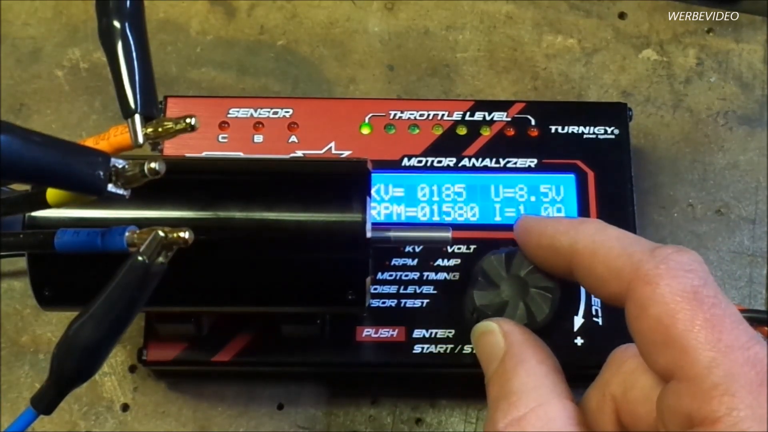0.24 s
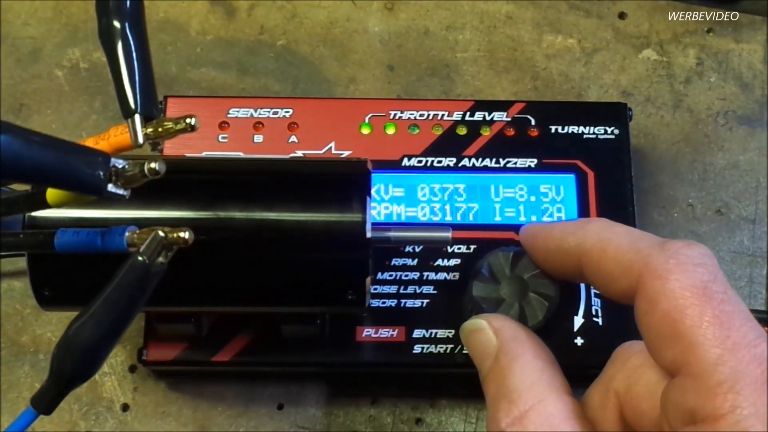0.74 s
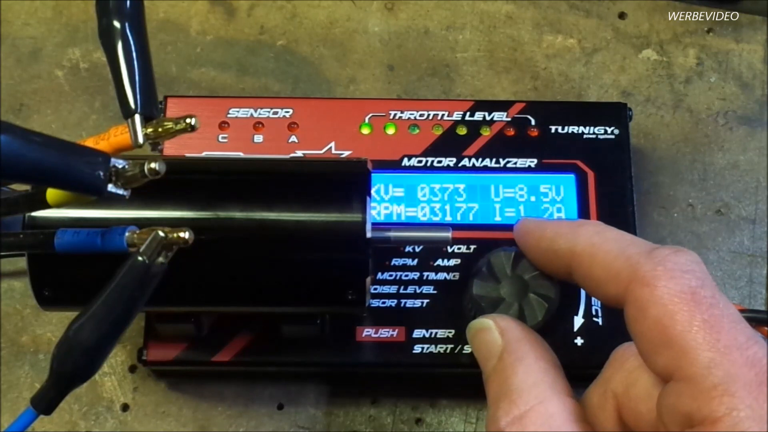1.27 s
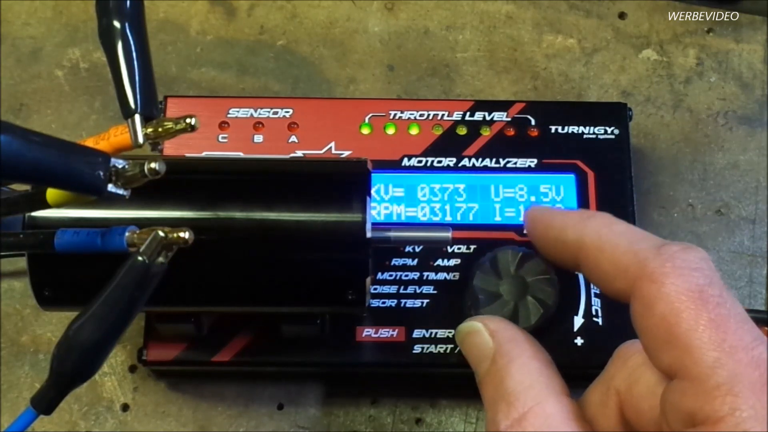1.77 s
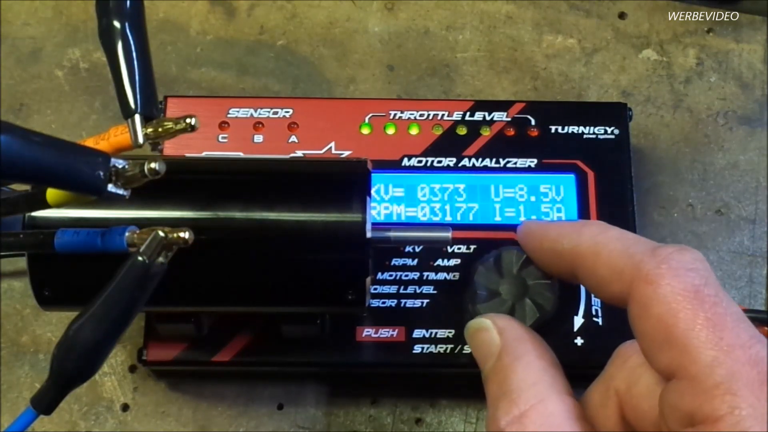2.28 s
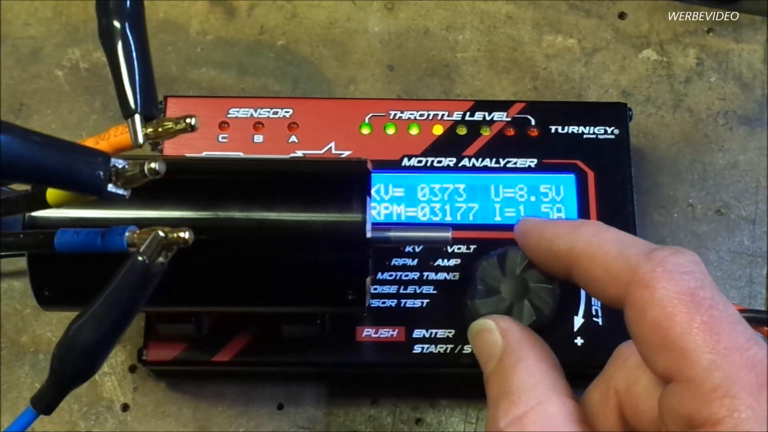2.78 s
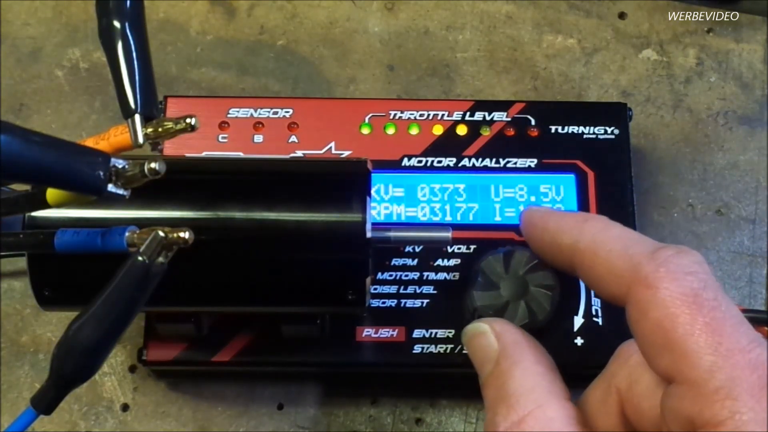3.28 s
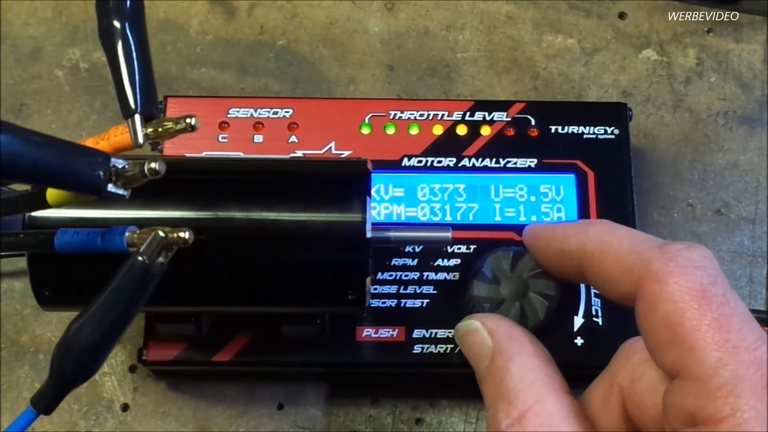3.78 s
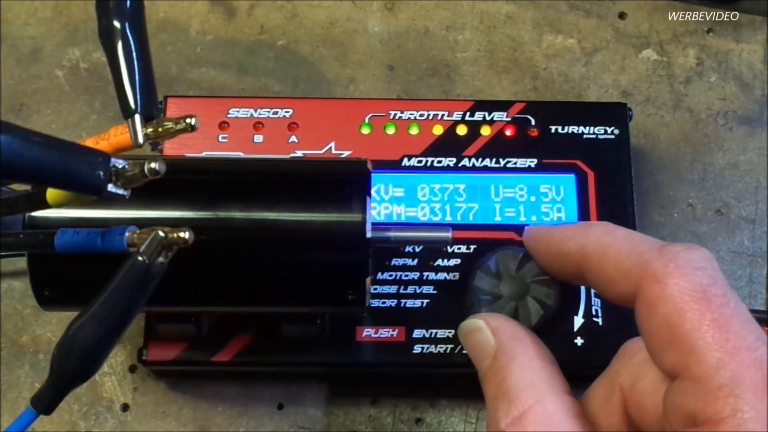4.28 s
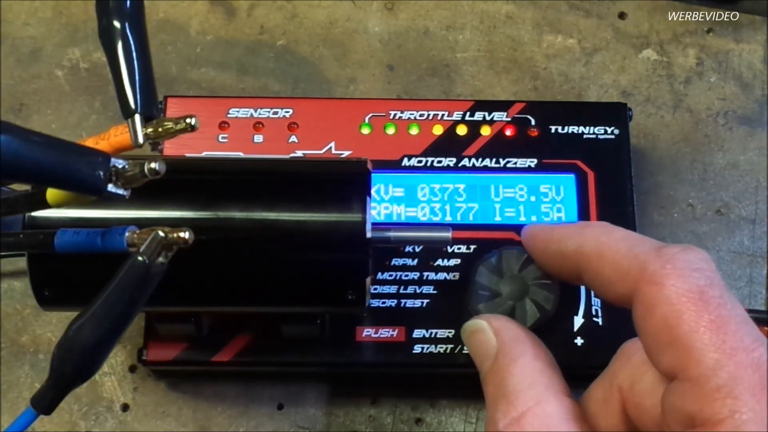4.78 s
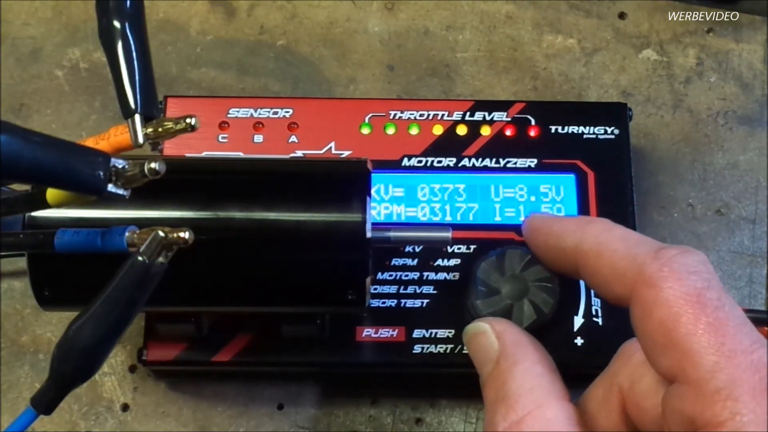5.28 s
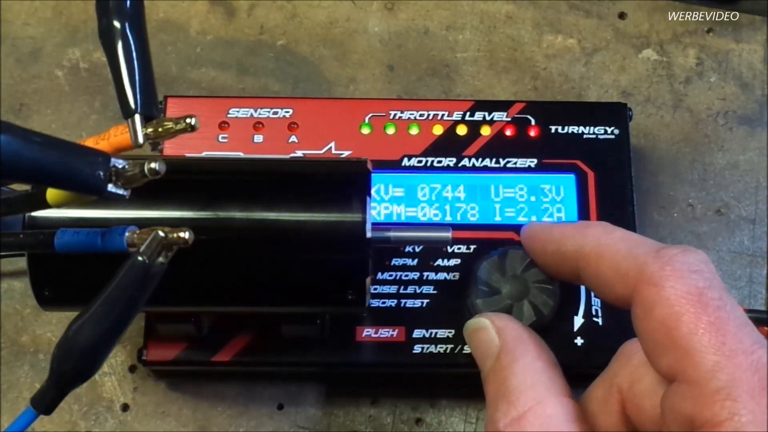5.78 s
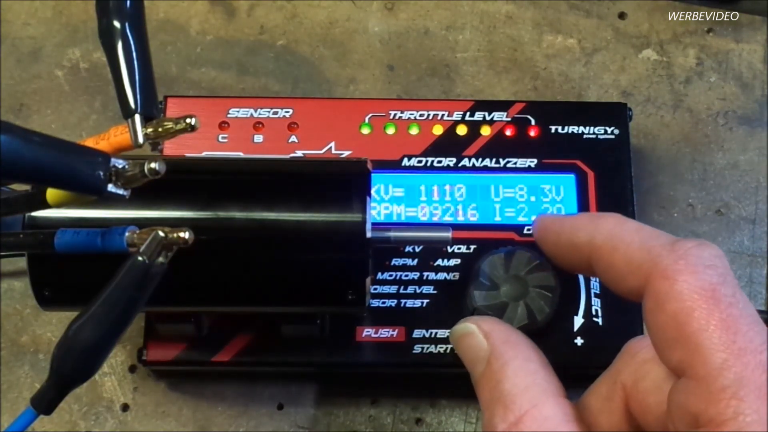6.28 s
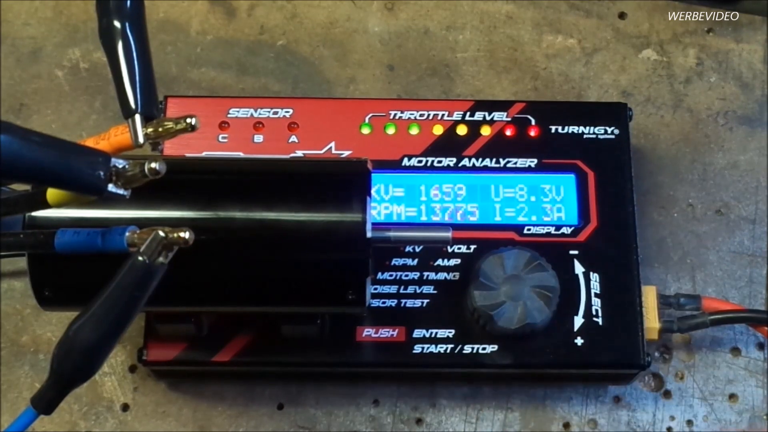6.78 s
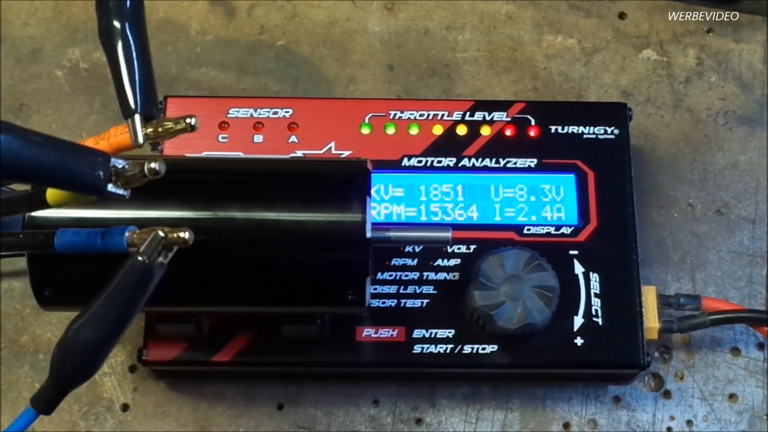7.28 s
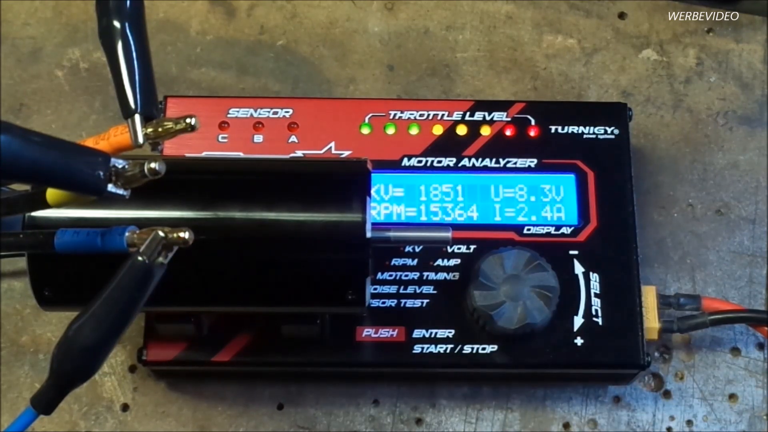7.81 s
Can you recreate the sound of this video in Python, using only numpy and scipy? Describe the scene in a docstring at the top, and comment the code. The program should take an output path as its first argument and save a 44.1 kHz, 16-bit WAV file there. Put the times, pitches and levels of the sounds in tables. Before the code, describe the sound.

A small brushless motor, heard very close on a workbench, is already turning at the start. From 0 to 0.8 seconds it holds a nasal whine around 1.6 kHz over a soft, rough bearing rush. From about 0.9 the pitch rises quickly, reaching roughly 2.2 kHz by 1.5, then climbs in smaller, slowing steps to about 2.8 kHz by 3.5 and 3 kHz by 5. Low hum and shrill overtones an octave up rise with it, flaring and dipping as they cross resonances of the metal housing. A thin fixed whistle near 8 kHz is strongest around 2 seconds and fades later. Fine bearing ticks blend into a high grainy sizzle. A last small lift comes between 6.4 and 7 seconds, then a steady whine near 3.2 kHz continues to 8, without stopping. Faint low drone and quiet hiss lie underneath; the sound is centred, with little room.

```python
"""A steady whine and rush come first: a small brushless motor idles, unloaded, on a bench close by.
Its throttle is then turned up, and tones at multiples of the shaft speed climb together.
They flare as they sweep through the resonances of the housing, which colour random bearing noise too.
The controller's whistle is strongest at half duty and fades out at full throttle.
A faint drone and a quiet hiss lie underneath."""
import sys
import numpy as np
from scipy import signal
from scipy.fft import rfft, irfft, next_fast_len
from scipy.io import wavfile
from scipy.ndimage import uniform_filter1d

SR = 44100
rng = np.random.default_rng(int(sys.argv[2]) if len(sys.argv) > 2 else 0)


def to_wav(s):
    """Save 16-bit WAV."""
    ch = np.atleast_2d(s).T  # columns
    pcm = np.round(np.clip(ch, -1, 1) * 32767)  # PCM
    wavfile.write(sys.argv[1], SR, pcm.astype(np.int16))


N = 355005

# Shaft speed as the throttle is turned up in stages: (t/s, speed/Hz)
SPEED = [(0.0, 133.55), (0.2, 134.89), (0.76, 133.74), (0.87, 138.79), (1.47, 186.11), (1.74, 191.21),
         (2.17, 211.36), (2.48, 222.08), (2.95, 230.86), (3.38, 236.84), (3.87, 241.63), (4.76, 249.01),
         (5.34, 251.83), (5.47, 254.01), (6.42, 256.93), (6.62, 259.85), (6.93, 267.04), (8.05, 266.88)]
INERTIA_S = 0.12  # the rotor rounds off each change of throttle over this time
MID_SPEED_HZ = 200  # the speed at which tone levels are stated

# An order is a tone's pitch in multiples of the shaft speed.
# Tone rows, one for each order: (level/dB at mid speed before swells, growth/dB per doubling of speed,
#   swells or dips [(speed/Hz, half width/Hz, change/dB), ..]); levels are before the housing.
# Magnetic pull at 12 commutations a turn, and its neighbours one turn rate away
WHINE_ORDERS = (11, 12, 13)
WHINE_ROWS = [(-48.7, 5.1, [(161.2, 2.2, 4), (167.6, 2.6, -15), (201.7, 13.3, 2.4), (238.3, 8.1, -6.4),
              (257.3, 1, -5.3)]), (-55.8, 6.8, [(166.8, 3, 12.5), (172.9, 5, -11.5), (219.2, 5.7, -8.7),
              (243.5, 8.1, 6.2), (266, 1.9, -11.9)]), (-57.7, 3.3, [(143.9, 2.1, 9.3), (235.9, 4.6, -5.8),
              (254.7, 10.9, -8.4), (262.9, 1.1, -8.2)])]
# Overtones an octave above the whine; same columns
SHRILL_ORDERS = (22, 23, 24, 26)
SHRILL_ROWS = [(-79, 10, [(230, 14.5, 11), (253.7, 16, 10.7), (260.8, 3.3, 6.9)]),
               (-65.5, -8.5, [(150.6, 1.1, 4), (201, 31, 10), (248, 3.2, -13), (267, 7.8, 3)]),
               (-76, 9, [(226, 10, 3)]), (-81, 13.5, [(245, 10.4, 11), (217.5, 11, 12), (267, 3, 0)])]
SHRILL_FADE_DB, SHRILL_FADE_HZ = 2, 2  # size and rate of their random fades
# Pitches at which the sides of the can cancel each other: (f/Hz, half width/Hz, change/dB)
CAN_NULLS = [(2020, 12, -4), (2142, 12, -4), (2343, 14, -6), (3345, 45, -15), (3835, 70, -10),
             (4247, 55, -10), (4552, 45, -20), (5303, 30, -10)]
# Unbalance, bearing balls passing, four poles passing, orders 7 and 8; tone rows as above
HUM_ORDERS = (1, 2.57, 4, 7, 8)
HUM_ROWS = [(-65, 15.3, [(165, 9, -14), (176, 6, 8), (232, 7.9, 6), (245.6, 4.4, -5.5), (134, 20, -9)]),
            (-74, 40.3, [(230, 20.8, -28)]), (-68.5, 16.5, [(150, 12, -17), (228, 7.2, -12.5),
            (260, 5.3, 5.5)]), (-88.5, 5, [(242, 21, 3.7)]), (-80.5, 5.3, [(216, 5.9, 6.9),
            (254.6, 20.4, 15.3), (231.7, 4, 4.3)])]
# Faint orders, one row each: (level/dB, loudest speed/Hz, change of speed that costs 6 dB/Hz)
FAINT_ORDERS = (6, 9, 14, 16, 18.71, 20, 21, 25.56, 28, 35, 36)
OVERTONE_ROWS = [(-74.5, 255, 5), (-78, 226, 30), (-66, 310, 11), (-81, 690, 87), (-72.5, 243, 15),
                 (-74.5, 263, 46), (-62.5, 164, 2), (-84, 410, 71), (-77, 214, 29), (-73.5, 135, 9),
                 (-77, 220, 14)]

# Controller whistle: pitch, level at half duty, and powers that shape duty and strength
SWITCH_HZ, SWITCH_DB, DUTY_POWER, RIPPLE_POWER = 7964.6, -62, 1.8, 0.67
# Sidebands that commutation puts on it: (offset/shaft speeds, level against the carrier/dB)
SIDEBANDS = [(-5, -21), (-10, -10), (14, -25)]

RACE_ORDER = 4.428  # ticks per turn of the shaft
# Harmonics of the bearing race's ticks, before the bite: (f/Hz, level/dB)
RACE_SPECTRUM = [(6000, -95), (6700, -82), (7150, -77), (7600, -90), (8500, -79), (9100, -76),
                 (9500, -74.5), (10000, -74.5), (10600, -100), (11200, -80), (12000, -82), (13000, -90)]
# How hard the balls strike the blemish: one row with the columns of a tone row
RACE_BITE = (1.9, 1.6, [(237, 9.4, 4.5), (266.6, 5, -11)])
# Shape of the rolling noise, later scaled to its overall level: (f/Hz, relative level per Hz/dB)
ROLLING_SPECTRUM = [(40, -12), (130, -6.5), (300, -1), (560, -3.5), (930, -1.5), (1300, -3.5), (1780, -15),
                    (2150, -5.5), (2800, -7), (3500, -10), (4500, -3.5), (7200, -17), (10400, -12.5),
                    (15000, -8)]
ROLLING_DB = -58.5  # overall level at top speed, before throb, unrest and housing

# Resonances of the motor can and its stand: (f/Hz, width/Hz, level against the direct sound/dB)
HOUSING_MODES = [(122, 7.6, 10), (303, 32, -1.5), (560.3, 25.8, 16.5), (918.6, 42, 12.5), (1800, 22, 30),
                 (1913, 25, 5), (3470, 100, 10), (7144, 330, 10), (9490, 330, 2), (10520, 470, 7)]
# Low drone under the bench: one row with the columns of a tone row
DRONE_ROW = (-82, -2.6, [(243, 12, 7)])
# Shape of the room and microphone hiss, later scaled: (f/Hz, relative level per Hz/dB)
HISS_SPECTRUM = [(20, 10.5), (58, -33), (85, -6), (200, -2.5), (500, -2), (1150, 4), (2000, 1), (4000, -7),
                 (6000, -7), (8300, -7), (10500, -4), (11300, -11.5), (11900, -6), (12800, -8.5),
                 (15000, -18)]
HISS_DB = -57  # overall level
EDGE_HZ = 15000  # upper limit of the recorder

LEAD = SR // 4  # samples before time zero, so the motor already turns and the housing rings
LENGTH = LEAD + N
T = (np.arange(LENGTH) - LEAD) / SR
SIZE = next_fast_len(LENGTH + SR)
HZ = np.fft.rfftfreq(SIZE, 1 / SR) + 1e-3  # just above zero, to allow logs and division


def amp(db):
    """Turns decibels into gain."""
    return 10 ** (np.asarray(db) / 20)


def unit(x):
    """Scales a signal to rms 1."""
    return x / np.sqrt(np.mean(x ** 2) + 1e-20)


def filtered(x, response):
    """Applies a frequency response."""
    return irfft(rfft(x, SIZE) * response, SIZE)[:LENGTH]


def noise(spectrum):
    """Makes random noise of rms 1 with the given spectrum."""
    hz, db = np.transpose(spectrum)
    shape_db = np.interp(np.log(HZ), np.log(hz), db)
    return unit(filtered(rng.standard_normal(LENGTH), amp(shape_db)))


def waver(rate_hz):
    """Makes a slow random drift of rms 1; faster changes than the rate fade away."""
    return unit(filtered(rng.standard_normal(LENGTH), 1 / (1 + (HZ / rate_hz) ** 2)))


def bumps(rows, hz):
    """Adds up bell-shaped swells and dips along a frequency, in dB."""
    return sum(db * np.exp(-((hz - centre) / width) ** 2) for centre, width, db in rows)


def level(row, speed):
    """Gives the level in dB at each speed: steady growth plus the row's swells."""
    db, growth_db, swells = row
    return db + growth_db * np.log2(speed / MID_SPEED_HZ) + bumps(swells, speed)


def tone(angle, db, flutter, flutter_hz):
    """A pure tone of rms level db that trembles a little in strength and phase."""
    start, tremble_start = rng.uniform(0, 2 * np.pi, 2)
    steady = np.cos(angle + start)
    tremble = flutter * waver(flutter_hz) * np.cos(angle + tremble_start)
    return np.sqrt(2) * amp(db) * (steady + tremble)


def mode(hz, width):
    """Frequency response of one resonance, with gain 1 at its centre."""
    return 1 / (1 + 1j * (HZ ** 2 - hz ** 2) / (HZ * width))


def shaft_speed():
    """The rotor's inertia smooths the stages of the throttle."""
    stages = np.interp(T, *np.transpose(SPEED))
    return uniform_filter1d(stages, round(INERTIA_S * SR), mode="nearest")


def shaft_angle(speed):
    """The turns add up to an angle in radians, with a slight random unsteadiness of speed."""
    unsteady_speed = speed + 0.037 * waver(rate_hz=8.5)
    return 2 * np.pi * np.cumsum(unsteady_speed) / SR


def whine(angle, speed):
    """The magnets tug at the can with each commutation."""
    out = np.zeros(LENGTH)
    for order, row in zip(WHINE_ORDERS, WHINE_ROWS):
        db = level(row, speed) + bumps(CAN_NULLS, order * speed)
        out += tone(order * angle, db, flutter=0.1, flutter_hz=25.2)
    return out


def shrill(angle, speed):
    """The tugs are not smooth, so they also sound an octave higher."""
    out = np.zeros(LENGTH)
    for order, row in zip(SHRILL_ORDERS, SHRILL_ROWS):
        fade_db = SHRILL_FADE_DB * waver(SHRILL_FADE_HZ)
        db = level(row, speed) + bumps(CAN_NULLS, order * speed) + fade_db
        out += tone(order * angle, db, flutter=0.11, flutter_hz=23)
    return out


def hum(angle, speed):
    """Unbalance, bearing balls and poles shake the stand."""
    out = np.zeros(LENGTH)
    for order, row in zip(HUM_ORDERS, HUM_ROWS):
        out += tone(order * angle, level(row, speed), flutter=0.12, flutter_hz=25)
    return out


def overtones(angle, speed):
    """Each faint overtone swells around its own speed."""
    out = np.zeros(LENGTH)
    for order, (db, best_hz, spread_hz) in zip(FAINT_ORDERS, OVERTONE_ROWS):
        swell_db = -20 * np.log10(2) * ((speed - best_hz) / spread_hz) ** 2
        out += tone(order * angle, db + swell_db, flutter=0.13, flutter_hz=20.0)
    return out


def controller(angle, speed):
    """Chopped current makes the windings whistle; the sidebands fan out with speed."""
    carrier = 2 * np.pi * SWITCH_HZ * T
    whistle = np.cos(carrier)
    for offset, db in SIDEBANDS:
        whistle += amp(db) * np.cos(carrier + round(offset) * angle)
    duty = (speed / speed.max()) ** DUTY_POWER
    ripple = abs(np.sin(np.pi * duty)) ** RIPPLE_POWER  # most at half duty, none at full
    return amp(SWITCH_DB) * ripple * whistle


def race(angle, speed, load=0.13, unrest_db=2.0, count=19):
    """Balls tick over a blemish on the inner race, which turns in and out of the load each turn."""
    hz, db = np.transpose(RACE_SPECTRUM)
    ticks = np.zeros(LENGTH)
    for order in RACE_ORDER * np.arange(1, count):
        strength = np.interp(order * speed, hz, amp(db), left=0, right=0)
        ticks += strength * np.cos(order * angle + rng.uniform(0, 2 * np.pi))
    bite_db = level(RACE_BITE, speed) + unrest_db * waver(rate_hz=14)
    return ticks * (1 + load * np.cos(angle)) * amp(bite_db)


def bearings(angle, speed, growth=0.18, throb=0.1, unrest_db=1.14):
    """Rolling noise grows with speed, throbs once a turn and wavers at random."""
    speed_gain = (speed / speed.max()) ** growth
    turn_gain = 1 + throb * np.cos(angle)
    unrest = amp(unrest_db * waver(rate_hz=25))
    return amp(ROLLING_DB) * speed_gain * turn_gain * unrest * noise(ROLLING_SPECTRUM)


def housing(force):
    """The force is heard directly and through the ringing resonances."""
    ringing = sum(amp(db) * mode(hz, width) for hz, width, db in HOUSING_MODES)
    return filtered(force, 1 + ringing)


def drone(speed, hz=61, width=5):
    """Noise through a narrow resonance makes a faint low drone that swells over one range of speeds."""
    rumble = unit(filtered(rng.standard_normal(LENGTH), mode(hz, width) ** 2))
    return amp(level(DRONE_ROW, speed)) * rumble


def hiss():
    """Steady random noise stands for the room and microphone."""
    return amp(HISS_DB) * noise(HISS_SPECTRUM)


def scene():
    """The motor over a quiet hiss, the same in both channels; shaft speed drives all but the hiss."""
    speed = shaft_speed()
    angle = shaft_angle(speed)
    tones = whine(angle, speed) + shrill(angle, speed) + hum(angle, speed) + overtones(angle, speed)
    force = tones + controller(angle, speed) + race(angle, speed) + bearings(angle, speed)
    sound = housing(force) + drone(speed) + hiss()
    return np.array([sound, sound])[:, LEAD:]


def record(dry):
    """The recorder steeply cuts everything above its upper limit."""
    low_pass = signal.firwin(1023, EDGE_HZ, window=("kaiser", 9), fs=SR)
    return signal.oaconvolve(dry, low_pass[None], "same")


dry = scene()
out = record(dry)
to_wav(out)
```